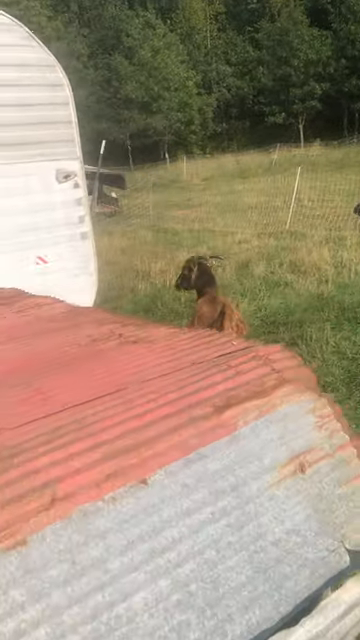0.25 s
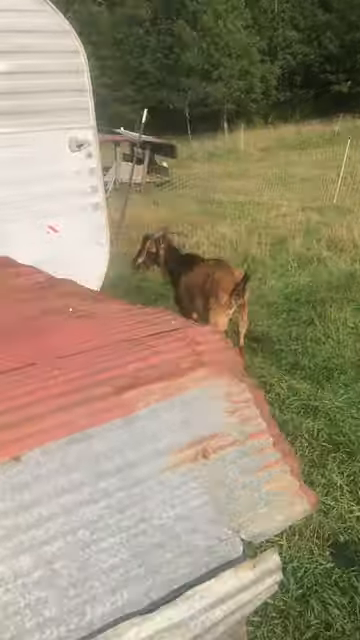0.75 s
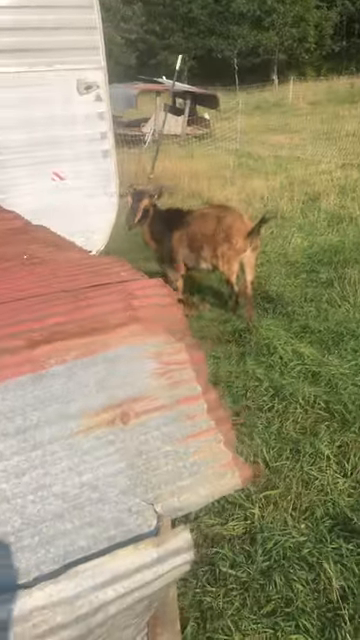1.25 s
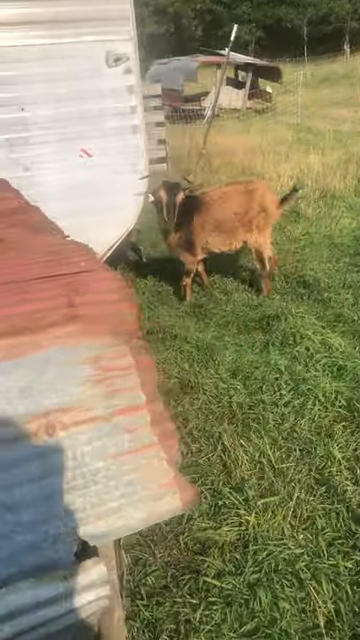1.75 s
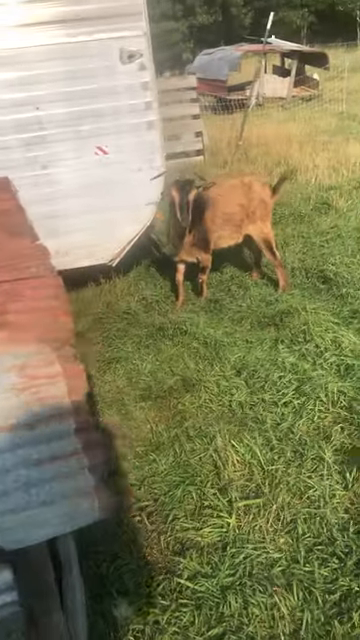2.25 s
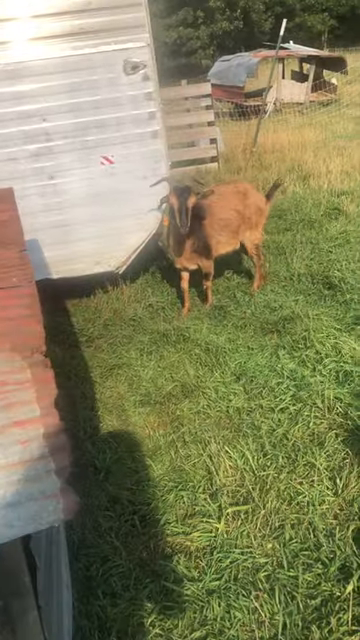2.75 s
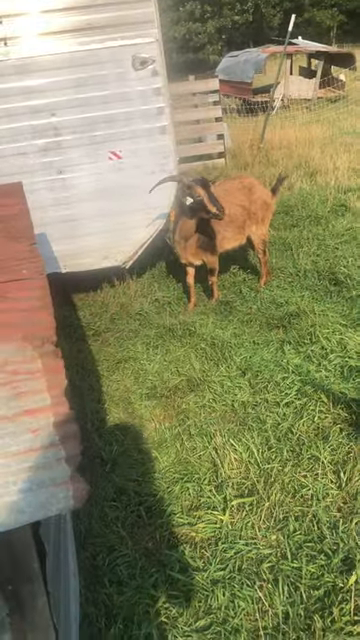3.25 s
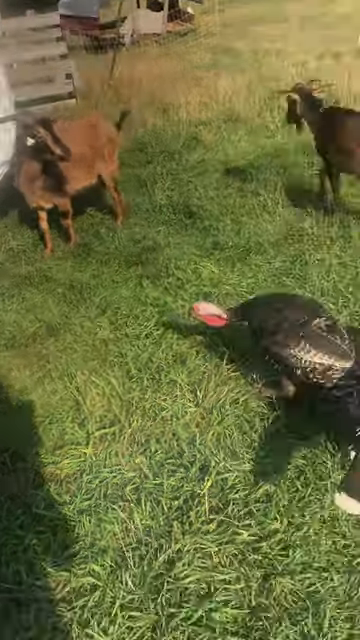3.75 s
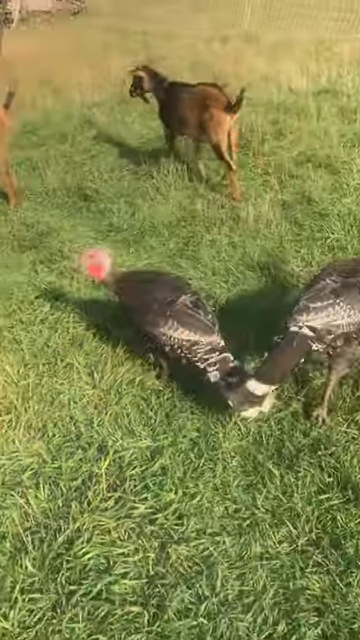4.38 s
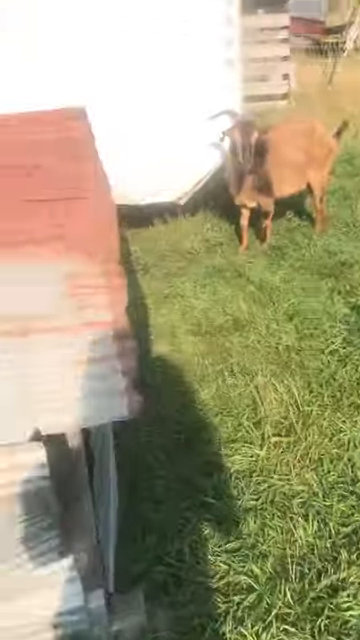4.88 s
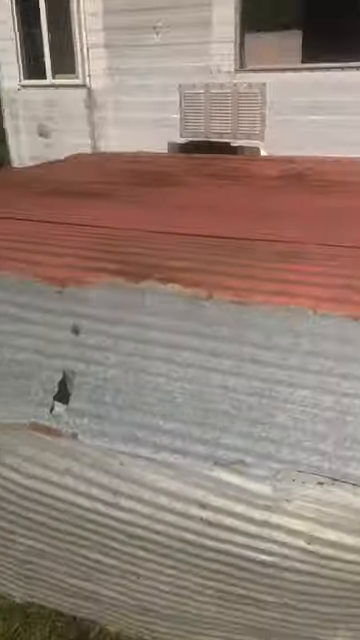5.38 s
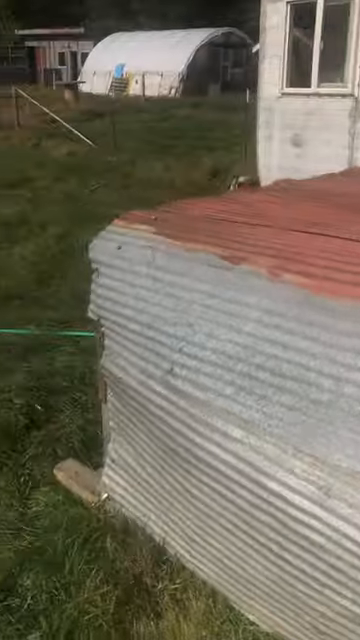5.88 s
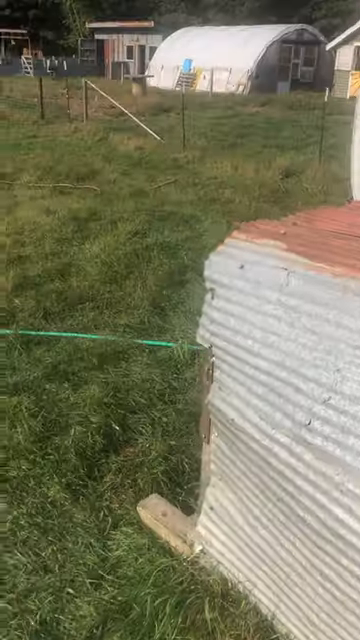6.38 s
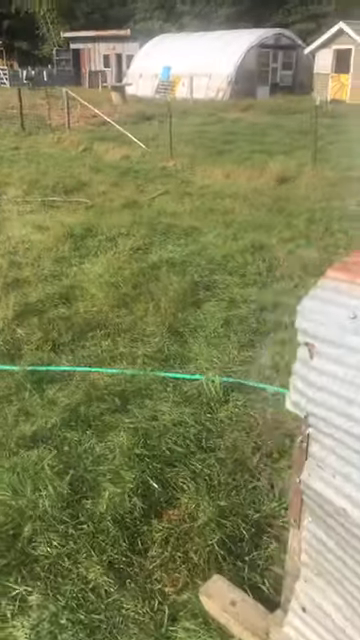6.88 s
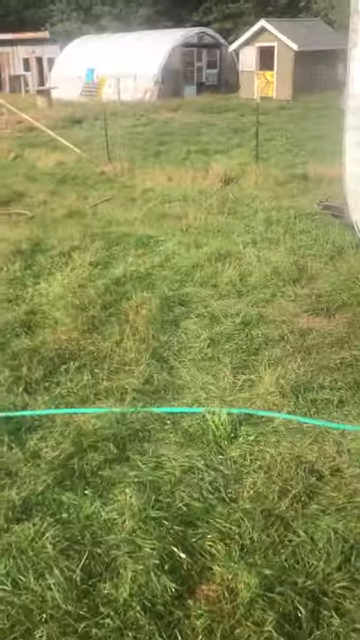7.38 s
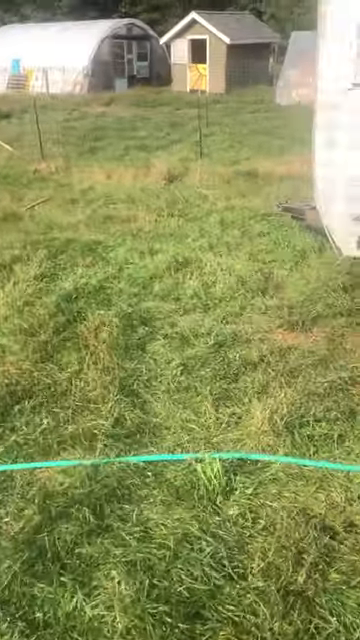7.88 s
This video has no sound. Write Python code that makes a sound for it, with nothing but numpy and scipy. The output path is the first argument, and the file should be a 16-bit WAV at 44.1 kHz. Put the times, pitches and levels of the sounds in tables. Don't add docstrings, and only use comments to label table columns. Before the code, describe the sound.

An open grassy farmyard, heard through a handheld microphone, begins with a low gust and a turkey calling at 0.2 s. Several turkeys follow in overlapping bursts: short, hollow whistles around 650 to 1100 Hz that crack into rapid warbles, about eighteen turns a second, with slight echo. Calls cluster at 0.6-1.5, 1.6-2.8, 3.1-3.9 and 4.2-4.8 s, one bright and loud near 4.6; later ones at 5.4-7.1 are mostly softer, with lone whistles to 7.9. Soft thumps on turf and grass rustles come sparsely, a far flock chatters at 3.2 and 4.6, and thin birds slide downward from 3.9, with quick rising chirps near 7.7. After 6.2 s wind flutters harder and steps turn heavy, strongest at 6.6 and 7.5. Loose sheet metal knocks at 7.65, 7.75 and loudest at 7.9. Faint crickets and distant traffic continue throughout.

```python
import sys
import numpy as np
from scipy import signal
from scipy.fft import rfft, irfft, next_fast_len
from scipy.io import wavfile
from scipy.ndimage import map_coordinates

SR = 44100
rng = np.random.default_rng(int(sys.argv[2]) if len(sys.argv) > 2 else 0)


def pcm_store(signal):
    levels = np.round(np.clip(np.atleast_2d(signal), -1, 1) * 32767)
    wavfile.write(sys.argv[1], SR, levels.astype(np.int16).T)


def invert_db(level):
    return 10 ** (np.asarray(level, dtype=float) / 20)


N = 358533
T = np.arange(N) / SR

# start in seconds, end in seconds, start pitch in Hz, end
# pitch in Hz, level in dB.
DEEP_WHISTLES = [(1.086, 1.145, 721, 725, -42), (2.067, 2.131, 746, 693, -43),
                 (2.709, 2.8, 736, 731, -45.5), (4.233, 4.353, 649, 673, -45),
                 (4.238, 4.308, 782, 704, -46.5), (6.698, 6.898, 650, 678, -53)]
THIN_WHISTLES = [(1.165, 1.278, 624, 664.4, -43.5), (5.486, 5.545, 723, 682, -45)]
BRIGHT_WHISTLES = [(0.615, 0.701, 868, 752, -40.5), (0.91, 0.942, 758, 820, -48)]
EVEN_WHISTLES = [(0.163, 0.217, 842, 867, -51), (2.54, 2.599, 900, 949, -49), (2.681, 2.695, 774, 650, -47),
                 (2.848, 2.873, 706, 642, -58.5), (3.55, 3.586, 852, 848, -52.5),
                 (3.644, 3.706, 692, 710, -44), (4.549, 4.592, 862, 886, -36),
                 (5.436, 5.512, 766, 777, -47.5), (7.442, 7.578, 688, 720, -50.5)]
ROUND_WHISTLES = [(5.808, 5.878, 935, 948, -57.5)]
HOLLOW_WHISTLES = [(4.986, 5.052, 947, 970, -61.5)]
PLAIN_WHISTLES = [(0.17, 0.234, 1114, 1169, -31.5), (1.153, 1.253, 950, 950, -51),
                  (1.594, 1.658, 1078, 1142, -42), (2.458, 2.524, 990, 975, -37.5),
                  (3.067, 3.126, 776, 804, -33.5), (3.177, 3.184, 875, 945, -39.5),
                  (3.547, 3.598, 910, 917, -48.5), (3.638, 3.674, 872, 910, -40),
                  (6.446, 6.483, 912, 1092, -43.5), (6.832, 6.901, 946, 981, -49.5),
                  (7.331, 7.343, 1116, 1860, -36.5), (7.885, 7.948, 873, 886, -40.5)]
# first crest in seconds, last crest in seconds, trough in Hz,
# crest in Hz, level in dB.
DEEP_WARBLES = [
    (1.165, 1.271, 634, 1248, -42),
    (2.17, 2.38, 696, 1205, -39.5),
    (4.39, 4.548, 670, 1254, -42.5),
    (6.91, 7.066, 679, 1071, -46.5),
]
THIN_WARBLES = [
    (1.294, 1.456, 631.5, 988, -39),
    (5.581, 5.792, 701, 1283, -42),
]
BRIGHT_WARBLES = [(0.732, 0.899, 715, 1340, -39.5)]
EVEN_WARBLES = [
    (3.717, 3.819, 636, 1044, -52),
    (4.613, 4.722, 870, 1340, -37),
]
ROUND_WARBLES = [(5.887, 6.054, 906, 1289, -53.5)]
HOLLOW_WARBLES = [(5.135, 5.289, 929, 1390, -60.5)]
PLAIN_WARBLES = [(0.247, 0.446, 905, 1226, -39.5), (0.335, 0.433, 842, 1060, -46),
                 (1.281, 1.442, 937, 1236, -46), (1.679, 1.73, 896, 1298, -46),
                 (2.546, 2.715, 892, 1300, -40), (3.691, 3.693, 840, 1180, -47),
                 (3.732, 3.88, 849, 1102, -44.5), (6.126, 6.177, 943, 1125, -44.5),
                 (6.513, 6.667, 876, 1278, -44.5), (6.914, 7.129, 930, 1147, -48.5)]
# start in seconds, end in seconds, half-way partials under the voice in dB.
DOUBLED_NOTES = [
    (0.182, .24, -40),
    (0.66, 0.714, -15),
    (1.076, 1.143, -13),
    (2.092, 2.158, -8.5),
    (2.74, 2.82, -15),
]
# frequency in Hz, level in dB.
THIRD_PARTIAL = [(1700, -7), (2150, -22), (2500, -30), (3300, -39)]
# frequency in Hz, level in dB.
SECOND_PARTIAL = [(900, -19), (1850, -18.5), (2300, -21.5), (2800, -24)]

# time in seconds, peak level in dB.
FOOTFALLS = [(0.506, -27), (1.724, -23), (2.926, -29.5), (3.22, -24.5), (3.868, -37.5), (4.786, -20),
             (5.224, -31.5), (5.742, -24.5), (6.277, -15), (6.341, -20.5), (6.563, -9.5), (6.982, -12.5),
             (7.47, -8)]
# start
# in seconds, end in seconds, level in dB, brightness in dB.
RUSTLES = [(0.234, 0.358, -44.5, 0), (3.204, 3.277, -45.5, -27), (4.63, 4.908, -67, -18),
           (6.348, 6.418, -32.5, -13), (6.492, 6.594, -37, -18), (6.808, 6.946, -46.5, -11.5),
           (7.053, 7.172, -48.5, -2.5), (7.318, 7.394, -37.5, -18), (7.446, 7.673, -45.5, -8),
           (7.636, 7.675, -21, -2.5), (7.987, 8.2, -39.5, -10.5), (8.02, 8.2, -62, 11)]
# frequency in Hz, density in dB per Hz.
GRASS_BODY = [(300, 0.5), (700, -5.5), (1700, -9), (2500, -24.5)]
# frequency in Hz, density in dB per Hz.
DRY_BLADES = [(1800, 3.5), (3000, -12.5), (5800, -15.5), (7500, -26), (15000, -42.5)]
# time in seconds, peak level in dB, body of the sheet in dB.
KNOCKS = [
    (6.977, -39, 10),
    (7.6186, -41, 10.5),
    (7.6494, -25, 12),
    (7.6551, -28.5, 11),
    (7.7453, -24.5, -2),
    (7.9161, -14.5, 7),
    (7.9506, -23, 6),
    (8.004, -56, 11),
    (8.0286, -35.5, 13),
]
# frequency in Hz, width in Hz, level in dB.
SHEET_MODES = [(570, 123, 1), (1300, 510, 3.5), (2100, 275, -5)]
# frequency in Hz, width in Hz, level in dB.
EDGE_MODES = [(3600, 3900, 3.5), (8400, 1250, -72)]

# time in seconds, level in dB.
GUSTS = [(0.0, -32), (0.2, -55.5), (0.27, -30), (0.61, -45.5), (1.06, -39), (1.13, -60.5), (1.47, -35),
         (1.54, -46.5), (1.72, -43.5), (1.94, -76), (2.6, -36.5), (4.12, -59.5), (4.21, -45), (4.3, -62.5),
         (5.77, -38), (5.82, -44.5), (6.05, -37), (8.13, -36)]
# frequency in Hz, density in dB per Hz.
BUFFET_COLOUR = [(13, -56.5), (22, -22), (59, -2.5), (75, 0), (200, -16), (260, -29.5), (440, -120)]
# frequency in Hz, density in dB per Hz.
FLUTTER_COLOUR = [(80, -41), (150, 1), (280, -4.5), (500, -21), (900, -20), (1800, -27)]
# start in seconds, end in seconds, start pitch in Hz, end pitch in Hz, level in dB.
BIRD_SLIDES = [(3.86, 4.047, 2130, 2036, -59), (4.63, 4.87, 2085, 1995, -58), (4.739, 4.774, 800, 584, -46),
               (4.744, 4.762, 1620, 1260, -37), (6.754, 6.818, 1660, 1440, -55),
               (5.83, 5.865, 2650, 2230, -63), (6.4, 6.422, 2650, 2300, -58),
               (6.434, 6.47, 2780, 2330, -57.5), (6.47, 6.476, 2350, 2870, -46),
               (6.212, 6.27, 2900, 2400, -61), (7.16, 7.244, 3040, 2380, -59),
               (7.24, 7.324, 2310, 2240, -60), (7.385, 7.424, 3200, 2400, -58),
               (7.62, 7.641, 1450, 1750, -41), (7.677, 7.707, 1400, 1680, -42.5),
               (7.722, 7.768, 1397, 1575, -44), (7.963, 7.978, 1100, 1230, -42)]
# start in seconds, end in seconds, level in dB.
FAR_FLOCK = [
    (3.205, 3.255, -53),
    (4.624, 4.889, -52),
]
# frequency in Hz, density in dB per Hz.
FLOCK_COLOUR = [(1150, -13), (1450, -3), (1800, 3), (2100, 1), (2350, -34)]
# frequency in Hz, density in dB per Hz.
YARD_COLOUR = [(100, -12), (180, -15.5), (590, -17), (900, -18), (1660, -17.5), (3190, -32.5), (5090, -35),
               (6280, -40), (8510, -34.5), (10300, -48.5), (16500, -50.5)]
# centre in Hz, spread in Hz, level in dB, chirps a second.
CRICKET_CHOIRS = [
    (5100, 530, -73, 30),
    (8335, 520, -71.5, 17),
]

# first partial in the low register in dB, crest in dB, place of the trough in a turn (1 is
# the next crest), share of the leap at the first crest (1 is the full leap), third partial in dB.
DEEP, THIN, BRIGHT = (-12, -1.5, .5, .8, 1.5), (-14.5, -10.5, 0.9, 0.7, -7.5), (-16, 0.5, 1.02, 1.7, 7.5)
EVEN, ROUND = (-3, -17, 0.38, 0.4, 1.5), (14.5, 11, 0.92, 1.14, 1)
HOLLOW, PLAIN = (17, 9, .42, .42, -3), (-0.13, 1.5, 0.7, 1, -13)
# dip in dB, height in the leap 0-1, spread 0-1.
RICH_FALL, ROUND_FALL = (-14, .6, .2), (-15, 0.506, 0.29)
HOLLOW_FALL, PLAIN_FALL = (-20, .92, .25), (-15.5, 0.553, 0.38)
SWELL_DB = -2.5


def unit(x):
    return x / np.sqrt(np.mean(x ** 2) + 1e-20)


def filtered(x, response):
    m = next_fast_len(N + 8192)
    return irfft(rfft(x, m) * response(np.fft.rfftfreq(m, 1 / SR)), m)[:N]


def along(points, hz):
    f, db = np.transpose(points)
    return np.interp(np.log(hz + 1), np.log(f + 1), db, left=-120, right=-120)


def noise(colour):
    return unit(filtered(rng.standard_normal(N), lambda hz: invert_db(along(colour, hz))))


def wobble(rate):
    return map_coordinates(rng.standard_normal(int(N * rate / SR) + 4), [T * rate])


def swell(start, end, rise, fall):
    return np.clip((T - start) / rise, 0, 1) * np.clip((end - T) / fall, 0, 1)


def pulse_phase(rate):
    return 2 * np.pi * np.cumsum(rate) / SR


def ease(v):
    return .5 - .5 * np.cos(np.pi * v)


def turkeys():
    dry, breath = np.zeros(N), wobble(120)
    doubling = sum(invert_db(db) * swell(a, b, 0.024, 0.0021) for a, b, db in DOUBLED_NOTES)
    flock = ((DEEP, RICH_FALL, DEEP_WHISTLES, DEEP_WARBLES), (THIN, RICH_FALL, THIN_WHISTLES, THIN_WARBLES),
             (BRIGHT, RICH_FALL, BRIGHT_WHISTLES, BRIGHT_WARBLES), (EVEN, RICH_FALL, EVEN_WHISTLES, EVEN_WARBLES),
             (ROUND, ROUND_FALL, ROUND_WHISTLES, ROUND_WARBLES),
             (HOLLOW, HOLLOW_FALL, HOLLOW_WHISTLES, HOLLOW_WARBLES),
             (PLAIN, PLAIN_FALL, PLAIN_WHISTLES, PLAIN_WARBLES))
    for bird, fall, whistles, warbles in flock:
        low_db, crest_db, _, _, third_db = bird
        for points in phrases(whistles, warbles, bird):
            s, hz, db, crest = np.transpose(points)
            first_db = db + np.where(crest, crest_db, low_db)
            if bird is PLAIN:
                second_db = first_db + along(SECOND_PARTIAL, 2 * hz)
            else:
                second_db = db - 27 * crest
            rows = np.transpose([s, hz, first_db, second_db])
            span, voice = call(rows, doubling, breath, third_db, *fall)
            dry[span] += voice
    dry *= invert_db(1.6 * wobble(90))
    tail = rng.standard_normal(SR // 4) * invert_db(-60 * T[:SR // 4] / 0.17)
    late = np.pad(dry, (400, 0))
    echo = signal.fftconvolve(late, tail / np.linalg.norm(tail))[:N]
    return dry + invert_db(-16.0) * echo


def phrases(whistles, warbles, bird):
    join_s, rise_s = .047, .034
    flick_s, flick, flick_db = 0.014, 1.072, -3.5
    found, alone = [], list(whistles)
    for row in warbles:
        first, _, trough_hz, _, db = row
        lead = [note for note in alone if 0 < first - note[1] < join_s]
        alone = [note for note in alone if note not in lead]
        opening = held(*lead[0]) if lead else [(first - rise_s, trough_hz, db + SWELL_DB, 0)]
        found.append(opening + warble(*row, bird))
    for note in alone:
        _, end, _, end_hz, db = note
        found.append(held(*note) + [(end + flick_s, flick * end_hz, db + flick_db, 0)])
    return found


def held(start, end, start_hz, end_hz, db):
    settled = start + min(0.01815, (end - start) / 3)
    return [(start, .92 * start_hz, db - 13, 0), (settled, start_hz, db + SWELL_DB, 0), (end, end_hz, db, 0)]


def warble(first, last, trough_hz, crest_hz, db, bird):
    turn_s, quicken = .055, .94
    fall_s, sag, fall_db = .03, .88, -5
    _, _, trough_place, first_leap, _ = bird
    beats = np.linspace(0, 1, round((last - first) / turn_s) + 1)
    crests = first + (last - first) * beats ** quicken
    troughs = np.append(crests[:-1] + trough_place * np.diff(crests), crests[-1] + fall_s)
    chance = rng.standard_normal((len(crests), 4))
    highs, lows = np.transpose([crest_hz, trough_hz] * (1 + 0.0189 * chance[:, :2]))
    short = (1 - first_leap) * 0.54 ** np.arange(len(crests))
    highs -= short * (crest_hz - trough_hz)
    lows[-1] *= sag
    level = db + 2 * chance[:, 2:]
    level[:, 0] -= 0.5 * short
    level[-1, 1] += fall_db
    points = []
    for k in range(len(crests)):
        points.append((crests[k], highs[k], level[k, 0], 1))
        points.append((troughs[k], lows[k], level[k, 1], 0))
    return points


def call(rows, doubling, breath, third_db, fall_db, fall_at, fall_spread):
    s, hz, first_db, second_db = np.transpose(rows)
    span = slice(round(s[0] * SR), round(s[-1] * SR))
    t = T[span]
    k = np.clip(np.searchsorted(s, t) - 1, 0, len(s) - 2)
    leap = np.log(hz[k + 1] / hz[k])
    up = leap > 0
    u = np.clip((t - s[k]) / (s[k + 1] - s[k]), 0, 1)
    height = np.where(up, u, 1 - u)
    crack_at = np.where(up, .66, fall_at)
    wide = np.clip((abs(leap) - .15) / 0.2827, 0, 1)
    cracked = 1 / (1 + np.exp(-(height - crack_at) / 0.069))
    climb = (1 - wide) * ease(height) + wide * (0.61 * ease(height ** 1.3) + 0.36 * cracked)
    pitch = np.minimum(hz[k], hz[k + 1]) * np.exp(abs(leap) * climb) * (1 + 0.01 * breath[span])
    high = (1 - wide) * height + wide * cracked
    share = np.where(up, high, 1 - high)
    near_crack = np.exp(-((height - crack_at) / np.where(up, .16, fall_spread)) ** 2)
    falter_db = np.where(up, -8, fall_db) * np.clip((abs(leap) - .08) / .2, 0, 1) * near_crack
    first, second = (invert_db(db[k] + (db[k + 1] - db[k]) * share + falter_db) for db in (first_db, second_db))
    second *= invert_db(np.where(up, 7, 3) * wide * height)
    second /= 1 + wide * (pitch / 1000) ** 12
    phase = pulse_phase(pitch)
    voice = first * np.sin(phase) + second * np.sin(2 * phase + 1)
    for order in (3, 4):
        voice += second * invert_db(third_db + along(THIRD_PARTIAL, order * pitch)) * np.sin(order * phase)
    loud = np.maximum(first, second)
    voice += loud * doubling[span] * (np.sin(1.5 * phase) + np.sin(2.5 * phase))
    edges = np.clip((t - s[0]) / 0.0012, 0, 1) * np.clip((s[-1] - t) / 0.004, 0, 1)
    return span, invert_db(7.0) * voice * edges


def thumps():
    t, blows = T[:SR // 25], np.zeros(N)
    phase = 2 * np.pi * (165 * t + 330 * 0.0044 * (1 - np.exp(-t / 0.0029)))
    shape = (t / 0.0023) ** 2 * np.exp(-t / 0.0019) * np.sin(phase - 1.3)
    for s, db in FOOTFALLS:
        blows[round(s * SR)] = invert_db(db + 6.5)
    return signal.fftconvolve(blows, shape)[:N]


def rustle():
    clumps = invert_db(1.4 * wobble(70))
    body = unit(clumps * noise(GRASS_BODY))
    blades = unit(clumps * invert_db(3.1 * wobble(400)) * noise(DRY_BLADES))
    return sum(invert_db(db) * swell(a, b, 0.021, 0.079) * (body + invert_db(bright_db - 0.5) * blades)
               for a, b, db, bright_db in RUSTLES)


def resonances(modes):
    return lambda f: sum((-1) ** k * invert_db(db) * 1j * f * w / (c * c - f * f + 1j * f * w)
                         for k, (c, w, db) in enumerate(modes))


def sheet_knocks():
    body, edge, t = np.zeros(N + SR), np.zeros(N + SR), T[:SR // 40]
    for s, db, body_db in KNOCKS:
        burst = rng.standard_normal(len(t)) * invert_db(-60 * t / 0.015) * np.clip(t / 0.00061, 0, 1)
        at = round(s * SR)
        body[at:][:len(t)] += invert_db(db + body_db + 13.5) * burst
        edge[at:][:len(t)] += invert_db(db + 2.5) * burst
    knocks = filtered(body[:N], resonances(SHEET_MODES)) + filtered(edge[:N], resonances(EDGE_MODES))
    return filtered(knocks, lambda f: (1 + 1j * f / 6500) ** -3)


def wind():
    gust_db = np.interp(T, *np.transpose(GUSTS))
    lumps = wobble(9)
    buffet = unit(invert_db(2.5 * lumps + 3.6 * wobble(22)) * noise(BUFFET_COLOUR))
    flutter = unit(invert_db(0.51 * lumps + 6.4 * wobble(30)) * noise(FLUTTER_COLOUR))
    rising_db = np.interp(T, [6.15, 6.5], [-9, -2.5])
    flutter_db = gust_db + rising_db + 0.11 * (gust_db + 44.0)
    return invert_db(gust_db + 0.2) * buffet + invert_db(flutter_db) * flutter


def songbirds():
    song = np.zeros(N)
    for a, b, start_hz, end_hz, db in BIRD_SLIDES:
        slide = np.interp(T, [a, b], [start_hz, end_hz])
        song += invert_db(db) * swell(a, b, 0.0055, 0.0011) * np.sin(pulse_phase(slide))
    return invert_db(3.8 * wobble(50)) * song


def chatter():
    pulses = invert_db(2 * np.sin(pulse_phase(85 * (1 + 0.151 * wobble(6.1)))))
    babble = unit(pulses * noise(FLOCK_COLOUR))
    return babble * sum(invert_db(db) * swell(a, b, 0.014, .02) for a, b, db in FAR_FLOCK)


def yard():
    sound = invert_db(-54.5) * noise(YARD_COLOUR)
    for hz, spread_hz, db, rate in CRICKET_CHOIRS:
        hiss = rng.standard_normal(N)
        band = unit(filtered(hiss, lambda f: np.exp(-.5 * ((f - hz) / spread_hz) ** 2)))
        beat = np.sin(pulse_phase(rate * (1 + 0.122 * wobble(2.6))))
        sound += invert_db(db + 4 * beat + 0.79 * wobble(1.62)) * band
    return sound


def scene():
    animals = turkeys() + songbirds() + chatter()
    ground = thumps() + rustle() + sheet_knocks()
    return (animals + ground + wind() + yard())[None]


def top_cut(x):
    return signal.sosfilt(signal.butter(12, 16690, fs=SR, output="sos"), x)


def record(dry):
    kept = filtered(dry.sum(axis=0), lambda hz: invert_db(-26 * (hz > 15760)))
    return top_cut(kept[None])


dry = scene()
out = record(dry)
pcm_store(out)
```